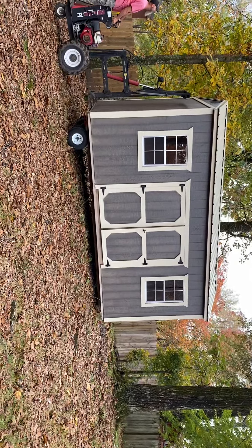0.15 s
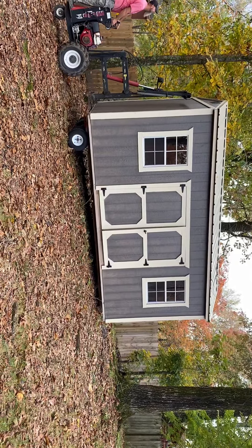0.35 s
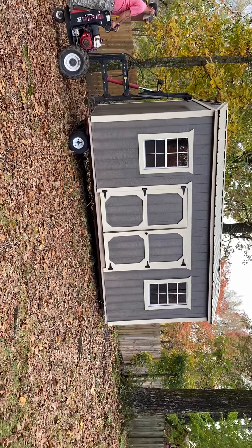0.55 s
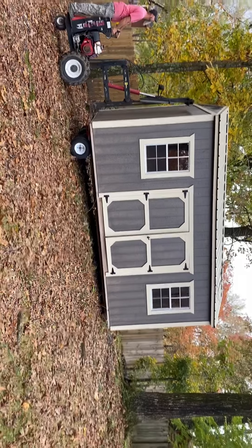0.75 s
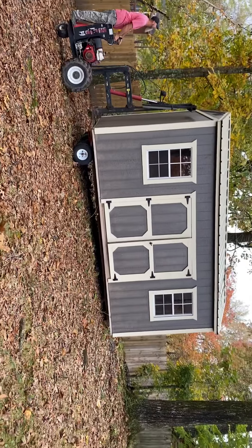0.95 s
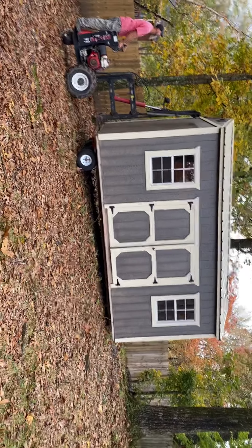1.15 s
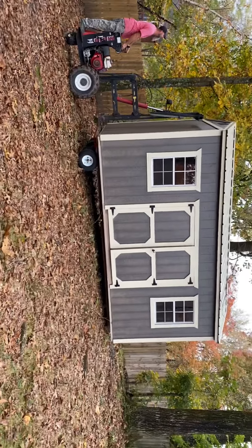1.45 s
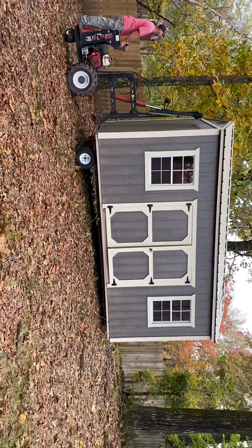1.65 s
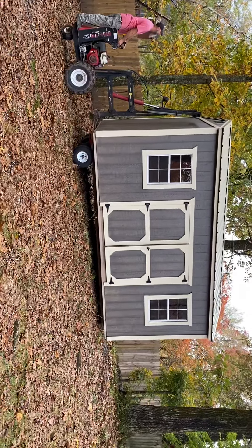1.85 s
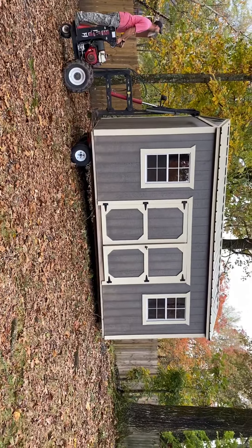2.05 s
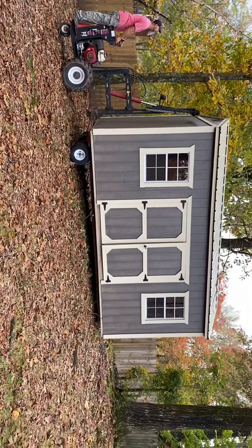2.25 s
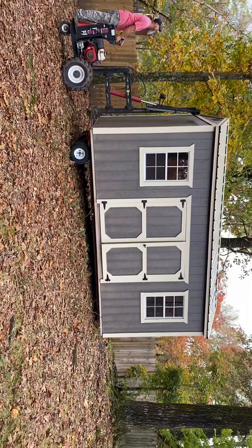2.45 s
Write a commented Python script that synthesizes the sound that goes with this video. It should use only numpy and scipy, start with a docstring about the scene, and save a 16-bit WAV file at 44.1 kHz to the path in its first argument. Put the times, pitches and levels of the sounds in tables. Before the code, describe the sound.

A small single-cylinder petrol engine on a yard tractor runs at a nearly constant speed outdoors, its rapid low exhaust putter mixed with metallic clatter, cooling-air rush and a thin fan whine; stereo, moderately close.

```python
"""Outdoors, a single-cylinder four-stroke petrol engine runs at a nearly steady speed.
Firings and strong afterbeats sound the exhaust and the pipe booms; fan and machine tones follow the speed.
Noise bursts in each cycle make gas spit, valve clatter and a tappet tick; struck modes make loose tin rattle.
Shaped noise gives cooling air, rasp and rumble; pairs of low tones make bursts of drone.
The left and right channels differ in phase and level by frequency."""
import sys
import numpy as np
from scipy import signal
from scipy.fft import rfft, irfft
from scipy.io import wavfile

SR = 44100
rng = np.random.default_rng(int(sys.argv[2]) if len(sys.argv) > 2 else 0)


def int16_out(signal):
    """Quantize to a 16-bit WAV file."""
    q = np.round(np.clip(np.atleast_2d(signal).T, -1, 1) * 32767)
    wavfile.write(sys.argv[1], SR, q.astype(np.int16))


N = 114660
TIME = np.arange(N) / SR
FREQ = np.maximum(np.arange(N // 2 + 1) * SR / N, 1)  # Hz, kept above zero for logarithms


def from_db(db):
    """Decibels to gain."""
    return 10 ** (np.asarray(db) / 20)


def in_time(rows):
    """A curve over seconds, read at every sample."""
    return np.interp(TIME, *np.transpose(rows))


def at_hz(points, hz):
    """A spectrum interpolated on a log-frequency axis."""
    f, value = np.transpose(points)
    return np.interp(np.log(hz), np.log(f), value)


def drift(corner_hz):
    """Low-passed noise with spread 1."""
    slow = irfft(rfft(rng.standard_normal(N)) / (1 + (FREQ / corner_hz) ** 2), N)
    return slow / slow.std()


# Correlation of the noise in the two channels. Each row: frequency in Hz, likeness 0-1.
CHANNEL_LIKENESS = [(30, .92), (70, .94), (200, .96), (400, .98), (700, .93), (1100, .85), (1800, .94),
                    (2600, .62), (3200, .72), (4400, .68), (5200, .86), (6000, .8), (7300, .96),
                    (9000, .82), (10400, .96), (12000, .75), (13400, .96), (15500, .7)]


def noise(db_per_hz, envelope=1):
    """Noise under an envelope, then coloured; a shared part makes the two channels partly alike."""
    shared, left, right = rfft(rng.standard_normal((3, N)) * envelope)
    alike = np.clip(at_hz(CHANNEL_LIKENESS, FREQ), 0, 1)
    separate = np.array([left, right])
    both = np.sqrt(alike) * shared + np.sqrt(1 - alike) * separate
    unit_density = np.sqrt(SR / 2)
    return irfft(both * from_db(db_per_hz) * unit_density, N)


def clicks(times, db):
    """One single-sample click at each time."""
    out = np.zeros(N)
    inside = (times >= 0) & (times < (N - 1) / SR)
    np.add.at(out, (times[inside] * SR).astype(int), from_db(db[inside]))
    return out


CONTACT_SPREAD_DB, CONTACT_JITTER_S = 1.3, .0004


def bursts(times, decay_s):
    """An envelope that jumps near each time, by a random strength, and decays exponentially."""
    late, strength = rng.standard_normal((len(times), 2)).T
    hits = clicks(times + CONTACT_JITTER_S * late, CONTACT_SPREAD_DB * strength)
    return signal.lfilter([1], [1, -np.exp(-1 / (decay_s * SR))], hits + 1e-18)


PUFF_SHARPNESS = 0.78  # 0 = swells as slowly as it dies, 1 = abrupt


def causal(db):
    """Impulse response with this spectrum: a quick swell, a longer ring; phase set via the cepstrum."""
    cepstrum = irfft(np.log(from_db(db)), N)
    fold = 1 + PUFF_SHARPNESS * np.sign(np.fft.fftfreq(N))
    return irfft(np.exp(rfft(cepstrum * fold)), N)


# Muffler response. Each row: multiple of the firing rate, level in dB.
MUFFLER_SPECTRUM = [(1, -77), (2, -55.5), (3, -58), (4, -36.5), (5, -36.5), (6, -40), (7, -38.5), (8, -32),
                    (9, -35.5), (10, -43.5), (11, -28.5), (12, -34), (13, -34), (14, -46.5), (16, -46.5),
                    (17, -52), (19, -52.5), (20, -59.5), (23, -54.5), (25, -86.5), (60, -68.5), (200, -110)]
# Strength of the firings. Each row: time in seconds, gain in dB.
FIRING_EFFORT = [(0, -0.5), (.17, -1), (.4, 0), (.9, -0.5), (1.1, -2), (1.3, -0.5), (1.45, -0.5),
                 (2.05, 0.5), (2.6, -1)]
FIRING_JITTER_S, FIRING_SPREAD_DB = 0.000087, .7
AFTERBEAT_S, AFTERBEAT_JITTER_S, AFTERBEAT_DB = 0.01538, .002, -18.5  # dB before the random surge


def exhaust(firings):
    """Each firing, plus a later gas surge of random size and sign, excites the muffler response."""
    rate = 1 / np.diff(firings).mean()
    late, strength, surge, lag = rng.standard_normal((len(firings), 4)).T
    puffs = clicks(firings + FIRING_JITTER_S * late, FIRING_SPREAD_DB * strength)
    surge_times = firings + AFTERBEAT_S + AFTERBEAT_JITTER_S * lag
    afterbeats = clicks(surge_times, np.full(len(firings), AFTERBEAT_DB))
    afterbeats = afterbeats * np.interp(TIME, firings + AFTERBEAT_S, surge)
    drive = (puffs + afterbeats) * from_db(in_time(FIRING_EFFORT))
    muffler = causal(at_hz(MUFFLER_SPECTRUM, FREQ / rate)) * SR / rate / np.sqrt(2)
    # The swell before each click needs the response centred.
    return -signal.fftconvolve(drive, np.fft.fftshift(muffler))[N // 2:N // 2 + N]


# Strong exhaust afterbeats. Each row: centre in seconds, peak level in dB.
STRONG_AFTERBEATS = [(0.388, -22), (.801, -27), (0.855, -22), (0.958, -26), (1.06, -20), (1.114, -18),
                     (1.216, -20), (1.269, -30), (1.374, -18), (1.477, -23), (1.528, -32)]
STRONG_AFTERBEAT_HZ, STRONG_AFTERBEAT_SIGMA_S = 97, 0.0057


def strong_afterbeats():
    """Strong exhaust afterbeats: a low, inverted Gaussian pulse about 15 ms after some firings."""
    out = 0
    for s, db in STRONG_AFTERBEATS:
        envelope = from_db(db) * np.exp(-.5 * ((TIME - s) / STRONG_AFTERBEAT_SIGMA_S) ** 2)
        out = out - envelope * np.cos(2 * np.pi * STRONG_AFTERBEAT_HZ * (TIME - s))
    return out


# Pipe boom before flicker. Each row: time in seconds, RMS level in dB.
BOOM_LEVEL = [(0, -35), (.1, -48), (.2, -31), (.3, -28.5), (.38, -27.5), (.46, -31.5), (.62, -33),
              (.78, -25.5), (1.0, -31), (1.14, -30), (1.22, -31), (1.45, -29), (1.6, -30.5), (2.0, -29.5),
              (2.6, -30.5)]
BOOM_LAG_S, BOOM_FLICKER_DB, BOOM_FLICKER_HZ = 0.0012, 1.66, 9.2


def boom(cycle, rate):
    """The exhaust pipe sounds on between firings: a flickering tone at five times the firing rate."""
    level_db = in_time(BOOM_LEVEL) + BOOM_FLICKER_DB * drift(BOOM_FLICKER_HZ)
    angle = 2 * np.pi * 5 * (cycle - BOOM_LAG_S * rate)
    return np.sqrt(2) * from_db(level_db) * np.cos(angle)


# Fan and machine tones that follow engine speed; 62.4 is not a crank multiple, and order 40 fits
# a 20-blade fan at two turns a cycle. Each entry: ratio to the firing rate.
TONE_ORDERS = [35, 40, 42, 43, 54, 62.4, 80, 110, 120, 152, 160, 199]
# Base levels of those tones, in the same order. Each entry: RMS level in dB before modulation.
TONE_DB = [-64, -41, -50, -67, -57, -54, -56.5, -57, -56, -52.5, -54, -58.5]
# Gain common to those tones. Each row: time in seconds, gain in dB.
WHINE_GAIN = [(0, 4.5), (.1, 3), (.28, 3.5), (.4, -3), (.47, -6), (.56, 0), (1.0, 0), (1.14, 3),
              (1.19, 2.5), (1.23, -9), (1.29, 5), (1.42, -1), (1.52, 0.5), (1.8, 1), (2.12, 0.5),
              (2.5, 1.5), (2.6, -5)]
WHINE_FLICKER_DB, WHINE_FLICKER_HZ = 1.46, 6.1
WHINE_WANDER_RAD, WHINE_WANDER_HZ = .45, 11
CRANK_WOBBLE_CYCLES, CRANK_WOBBLE_HZ = .0012, 14.4
TURN_RIPPLE_DB, TURN_RIPPLE_AT_CYCLE = -0.5, 0.16  # once a turn; negative = a dip at this place
BEAT_ORDER, BEAT_DB, BEAT_DB_PER_HZ = 41, -51, 38  # beats with order 40; level follows firing rate


def whine(cycle, rate):
    """Fan and machine tones follow the slightly uneven engine speed, flickering in level and phase."""
    angle = 2 * np.pi * (cycle + CRANK_WOBBLE_CYCLES * drift(CRANK_WOBBLE_HZ))
    ripple_db = TURN_RIPPLE_DB * np.cos(2 * (angle - 2 * np.pi * TURN_RIPPLE_AT_CYCLE))
    gain_db = in_time(WHINE_GAIN)
    tones = [(order, db + gain_db) for order, db in zip(TONE_ORDERS, TONE_DB)]
    tones.append((BEAT_ORDER, BEAT_DB + BEAT_DB_PER_HZ * (rate - rate.mean())))
    out = 0
    for order, db in tones:
        level = from_db(db + ripple_db + WHINE_FLICKER_DB * drift(WHINE_FLICKER_HZ))
        wander = WHINE_WANDER_RAD * drift(WHINE_WANDER_HZ)
        out = out + level * np.sin(order * angle + wander + 2 * np.pi * rng.random())
    return np.sqrt(2) * out


# Resonances of cowl and tins. Each row: frequency in Hz, width at half lift in Hz, lift in dB.
COWL_RESONANCES = [(780, 29, -7.5), (1377, 66, 7), (2210, 23, -1.5), (2320, 21, 6.5), (3000, 71, 8),
                   (3060, 67, 1), (3820, 48, 4.5), (5120, 560, 1.5), (6090, 260, 16.5)]


def cowl_db():
    """Spectral lift from sheet metal resonating in the path of the sound."""
    return sum(lift_db / (1 + (2 * (FREQ - hz) / width) ** 2)
               for hz, width, lift_db in COWL_RESONANCES)


# Events in each cycle. Each row: delay after the firing in seconds, decay time constant in seconds,
# spit gain in dB, clatter gain in dB.
CYCLE_CONTACTS = [(.0085, .006, -2, -9), (.0112, .002, -5, 4), (.019, .002, -20, -3), (.0255, .003, -5, -4),
                  (.033, .005, -14, -1.5), (.0465, .003, -10, -4)]
# Gas spit colour. Each row: frequency in Hz, density in dB per Hz at unit envelope.
SPIT_COLOUR = [(2000, -98), (5000, -83), (8000, -76.5), (10500, -77.5), (15000, -91)]
# Valve clatter colour before cowl lift. Each row: frequency in Hz, density in dB per Hz at unit envelope.
CLATTER_COLOUR = [(400, -62), (550, -66), (1000, -65), (1500, -74), (2500, -90), (4500, -78.5),
                  (6500, -92.5), (12000, -142)]
# Tappet tick colour. Each row: frequency in Hz, density in dB per Hz at unit envelope.
TICK_COLOUR = [(2500, -75), (4200, -84), (5600, -66), (7000, -123), (10000, -72), (14000, -100)]
TICK_DELAY_S, TICK_DECAY_S = .0275, .001


def valves(firings):
    """Gas spit, valve clatter and a tappet tick: decaying noise bursts near set delays after firing."""
    spit = clatter = 0
    for delay_s, decay_s, spit_db, clatter_db in CYCLE_CONTACTS:
        burst = bursts(firings + delay_s, decay_s)
        spit = spit + from_db(spit_db) * burst
        clatter = clatter + from_db(clatter_db) * burst
    tick = bursts(firings + TICK_DELAY_S, TICK_DECAY_S)
    out = noise(at_hz(SPIT_COLOUR, FREQ), spit)
    out = out + noise(at_hz(CLATTER_COLOUR, FREQ) + cowl_db(), clatter)
    return out + noise(at_hz(TICK_COLOUR, FREQ), tick)


# Modes of the loose sheet metal. Each row: frequency in Hz, t60 in seconds, level in dB before gains.
SHEET_MODES = [(2320, .05, -53.5), (2960, .06, -47), (3100, .08, -43.5), (3230, .04, -49.5),
               (3850, .08, -53.5)]
# Taps in each cycle. Each row: delay after the firing in seconds, gain in dB.
SHEET_TAPS = [(.0095, -3), (.0245, -5), (.0315, 0)]
# Rattle strength before the fixed gain. Each row: time in seconds, gain in dB.
RATTLE_GAIN = [(0, 0), (.2, -1), (.4, 5.5), (.55, 2.5), (.75, 0), (1.0, 2), (1.3, -11), (1.6, 0.5),
               (1.95, -2.5), (2.35, -1), (2.6, -4)]
TAP_SPREAD_DB, TAP_JITTER_S, RATTLE_FIXED_GAIN_DB = 3.5, .0006, 3.5


def ring(firings):
    """Loose sheet metal chatters: taps excite decaying resonators, each mode at a random strength."""
    taps = [(s + delay_s, db) for s in firings for delay_s, db in SHEET_TAPS]
    times, tap_db = np.transpose(taps)
    times = times + TAP_JITTER_S * rng.standard_normal(len(times))
    out = 0
    for hz, t60_s, db in SHEET_MODES:
        radius, w = from_db(-60 / (t60_s * SR)), 2 * np.pi * hz / SR
        hits = clicks(times, db + tap_db + TAP_SPREAD_DB * rng.standard_normal(len(times)))
        poles = [1, -2 * radius * np.cos(w), radius * radius]
        out = out + signal.lfilter([0, np.sin(w)], poles, hits + 1e-18)
    return out * from_db(RATTLE_FIXED_GAIN_DB + in_time(RATTLE_GAIN))


# Cowl air before lift and flutter. Each row: frequency in Hz, density in dB per Hz.
RUSH_COLOUR = [(300, -77), (520, -76), (700, -69.5), (950, -70), (1450, -73), (1650, -73), (1950, -75.5),
               (2600, -72.5), (3300, -75), (4200, -80), (5500, -78), (6700, -105.5), (9000, -115)]
# Fine air hiss before flutter. Each row: frequency in Hz, density in dB per Hz.
HISS_COLOUR = [(4500, -100), (6500, -85.5), (8000, -83), (10000, -83.5), (12000, -89), (14000, -94),
               (15500, -102)]
RUSH_FLUTTER_DB, RUSH_FLUTTER_HZ = 1.17, 30


def rush():
    """Cooling air: noise through the cowl resonances plus fine hiss, under one random flutter."""
    flutter = from_db(RUSH_FLUTTER_DB * drift(RUSH_FLUTTER_HZ))
    through_cowl = noise(at_hz(RUSH_COLOUR, FREQ) + cowl_db(), flutter)
    return through_cowl + noise(at_hz(HISS_COLOUR, FREQ), flutter)


# Rasp swells. Each row: centre in seconds, half-length at half amplitude in seconds, gain in dB.
RASP_SWELLS = [(0.137, 0.021, -2.5), (0.685, 0.022, -2), (0.777, 0.028, 0), (0.87, 0.016, -2),
               (1.348, 0.031, 2.5), (1.545, 0.022, -4), (1.69, 0.023, -0.5), (1.839, 0.019, 0),
               (2.012, 0.028, -3.5), (2.42, 0.01, -4.5)]
# Rasp colour. Each row: frequency in Hz, density in dB per Hz at unit envelope.
RASP_COLOUR = [(800, -89), (1150, -67), (1380, -61), (1550, -74.5), (2000, -81.5), (3000, -100)]
RASP_PULSE_DB, RASP_PULSE_AT_CYCLE = 1.5, 0.31


def rasp(cycle):
    """Brief swells of mid-range noise, throbbing once a crank turn."""
    throb = from_db(RASP_PULSE_DB * np.cos(4 * np.pi * (cycle - RASP_PULSE_AT_CYCLE)))
    swells = sum(from_db(db) / (1 + ((TIME - s) / length_s) ** 4) for s, length_s, db in RASP_SWELLS)
    return noise(at_hz(RASP_COLOUR, FREQ), throb * swells)


# Low drone. Each row: centre in seconds, lower tone's peak in dB before BURST_GAIN_DB, frequency in Hz.
DRONE_EVENTS = [(0.128, -27, 360), (0.212, -33.5, 368), (0.357, -30.5, 345), (0.504, -27.5, 373),
                (0.583, -24.5, 377.6), (0.644, -28, 381), (0.731, -32.5, 352), (0.809, -30.5, 358),
                (0.871, -31, 370.5), (0.961, -34, 344), (1.083, -32, 371), (1.247, -39, 338),
                (1.329, -26.5, 353), (1.388, -28, 345), (1.553, -26, 359), (1.684, -27.5, 357),
                (1.744, -27, 378.6), (1.889, -25.5, 365.5), (2.03, -25, 388), (2.122, -27.5, 367),
                (2.297, -28, 371.6), (2.435, -28.5, 359), (2.503, -29, 371.5)]
BURST_SIGMA_S, BURST_GAIN_DB = 0.025, -5.5
PARTNER_RATIO, PARTNER_DB = 1.175, -5  # weaker upper tone, relative to the lower


def drone():
    """Bursts of drone: two low tones swell and fade together under a Gaussian envelope."""
    out = 0
    phases = 2 * np.pi * rng.random((len(DRONE_EVENTS), 2))
    for (s, db, hz), phase in zip(DRONE_EVENTS, phases):
        angle = 2 * np.pi * hz * (TIME - s)
        partner = from_db(PARTNER_DB) * np.sin(PARTNER_RATIO * angle + phase[1])
        envelope = np.exp(-.5 * ((TIME - s) / BURST_SIGMA_S) ** 2)
        out = out + from_db(db + BURST_GAIN_DB) * envelope * (np.sin(angle + phase[0]) + partner)
    return out


# Rumble colour before gain. Each row: frequency in Hz, density in dB per Hz.
RUMBLE_COLOUR = [(18, -100), (30, -76), (42, -57), (62, -55), (95, -56.5), (130, -62), (240, -61),
                 (310, -61.5), (440, -67), (510, -96), (1000, -100)]
# Rumble strength. Each row: time in seconds, gain in dB.
RUMBLE_GAIN = [(0, 1.5), (.12, -3), (.38, 1.5), (.6, -4), (.9, 2.5), (1.22, 1.5), (1.5, 0.5), (1.7, 0.5),
               (1.9, 1.5), (2.3, 2.5), (2.6, 4.5)]


def rumble():
    """Low rumble: shaped noise with an uneven level."""
    return noise(at_hz(RUMBLE_COLOUR, FREQ), from_db(in_time(RUMBLE_GAIN)))


# Engine speed. Each row: time in seconds, firings per second.
FIRING_RATE = [(0.0, 19.259), (0.15, 19.211), (0.4, 19.53), (0.62, 19.267), (0.9, 19.364), (1.18, 19.118),
               (1.47, 19.444), (1.75, 19.298), (1.95, 19.297), (2.13, 19.4), (2.35, 19.135), (2.6, 19.399)]
FIRST_FIRING_S = .0068


def scene():
    """The integrated firing rate gives the engine cycle, which times firings, boom, whine and contacts."""
    rate = in_time(FIRING_RATE)
    cycle = np.cumsum(rate) / SR - FIRST_FIRING_S * rate[0]
    firings = np.interp(np.arange(round(cycle[-1])), cycle, TIME)
    engine = exhaust(firings) + strong_afterbeats() + boom(cycle, rate)
    engine = engine + whine(cycle, rate) + valves(firings) + ring(firings)
    return engine + rush() + rasp(cycle) + drone() + rumble()


# Phase between the channels. Each row: frequency in Hz, left lead in radians.
CHANNEL_LEAD = [(600, 0), (780, .25), (1050, -.85), (1400, -.1), (2100, 0), (2800, 1.6), (3800, .75),
                (4400, 1.4), (5100, .25), (6000, 1.7), (6600, 2.9), (8000, 3.4), (9700, 6), (11400, 6.5),
                (12700, 9.2), (14400, 9.6), (16000, 12)]
# Level between the channels. Each row: frequency in Hz, left minus right in dB.
CHANNEL_BALANCE = [(300, 0), (600, .3), (790, 1.8), (1000, 2.8), (1280, -3), (1600, 0), (2300, -1.5),
                   (2700, -3.5), (3050, 1.3), (3800, 1), (4300, -2.5), (5200, 0)]
CUTOFF_HZ = 15400


def record(dry):
    """Left and right channels differ in phase and level by frequency; a steep low-pass cuts the top."""
    lead_rad = np.interp(FREQ, *np.transpose(CHANNEL_LEAD))
    side = np.array([[.5], [-.5]])  # half the difference to each channel
    gain = from_db(side * at_hz(CHANNEL_BALANCE, FREQ))
    channels = irfft(rfft(dry) * np.exp(1j * side * lead_rad) * gain, N)
    low_pass = signal.ellip(10, .1, 90, CUTOFF_HZ, fs=SR, output="sos")
    return signal.sosfilt(low_pass, channels)


dry = scene()
out = record(dry)
int16_out(out)
```